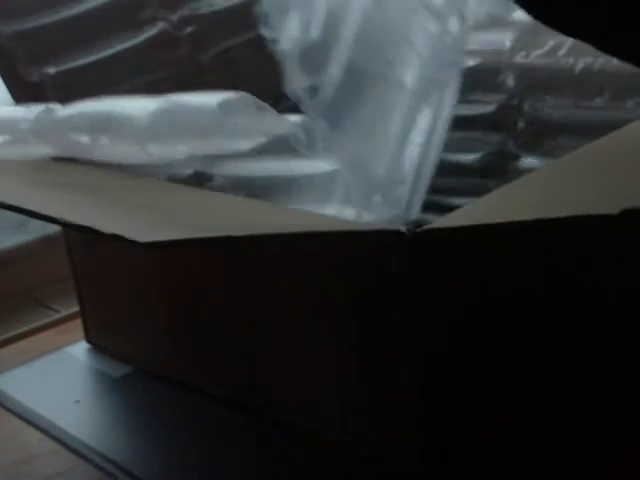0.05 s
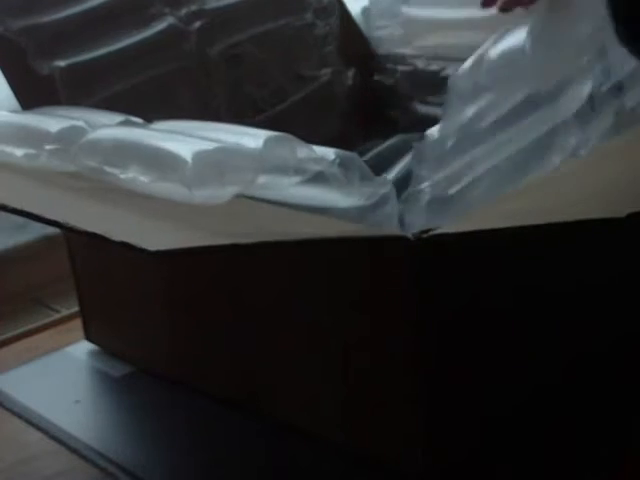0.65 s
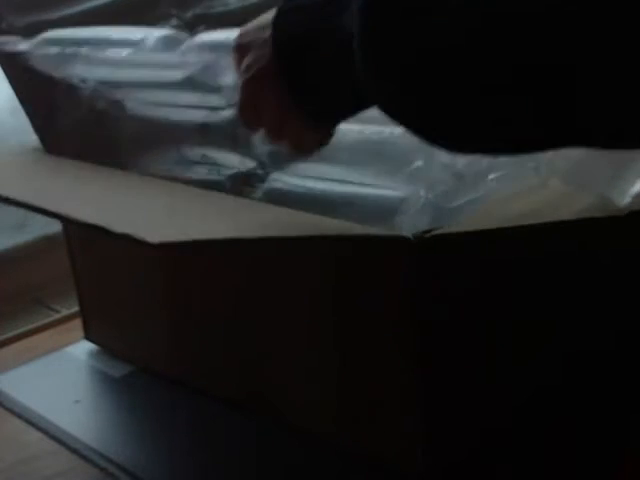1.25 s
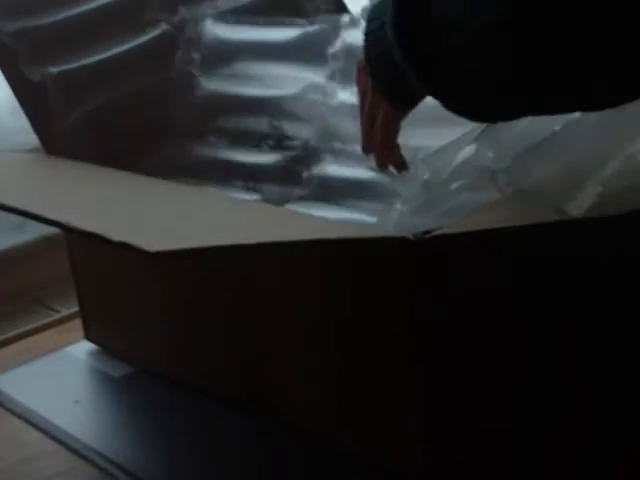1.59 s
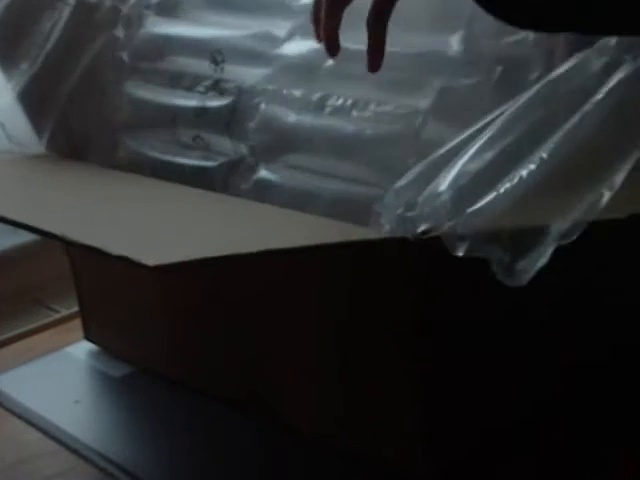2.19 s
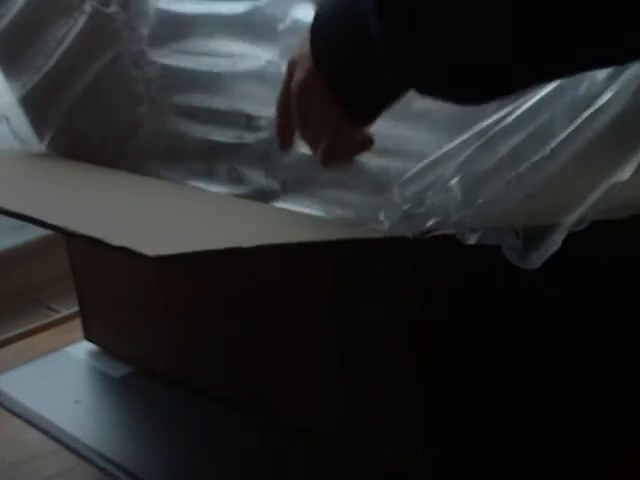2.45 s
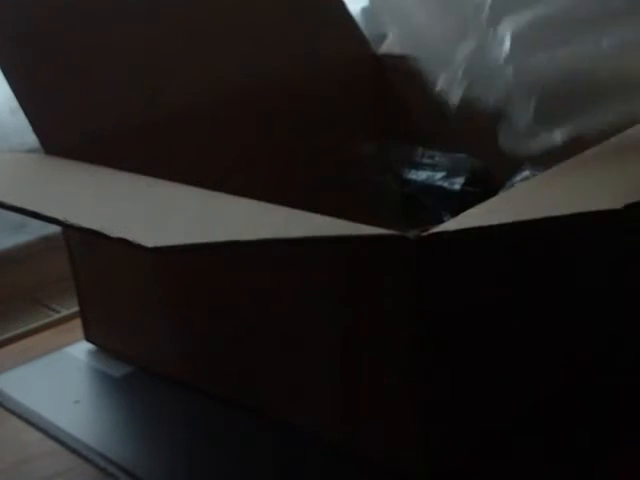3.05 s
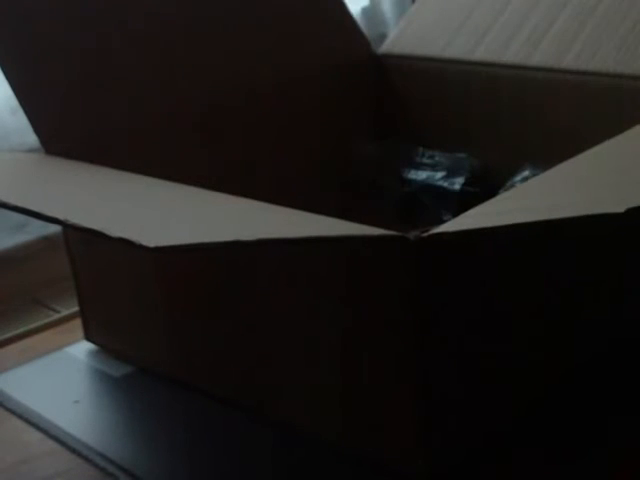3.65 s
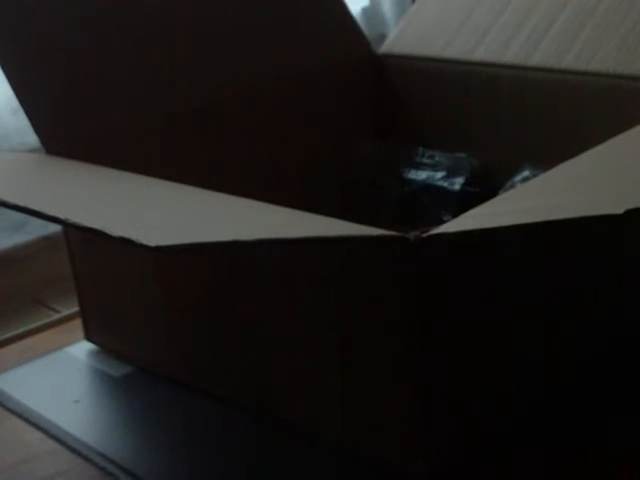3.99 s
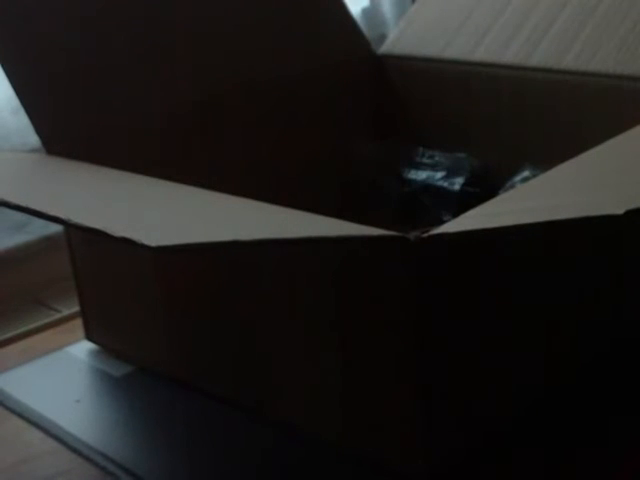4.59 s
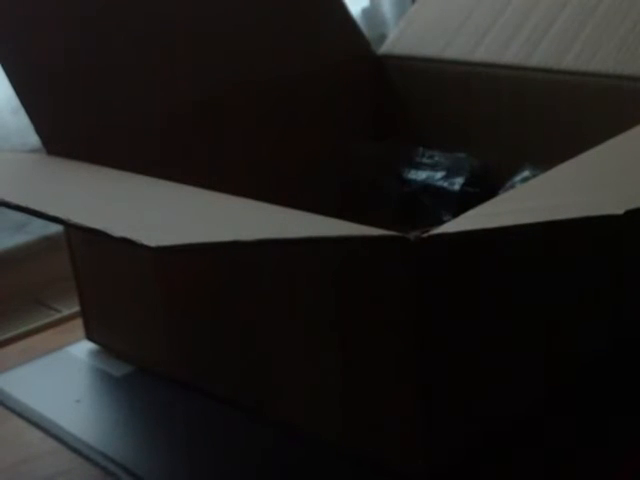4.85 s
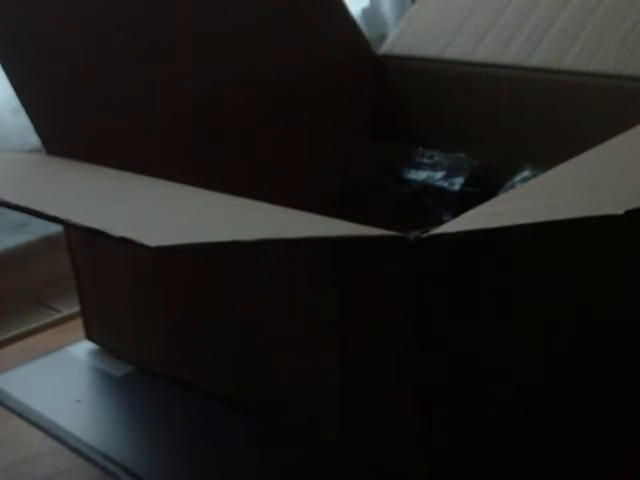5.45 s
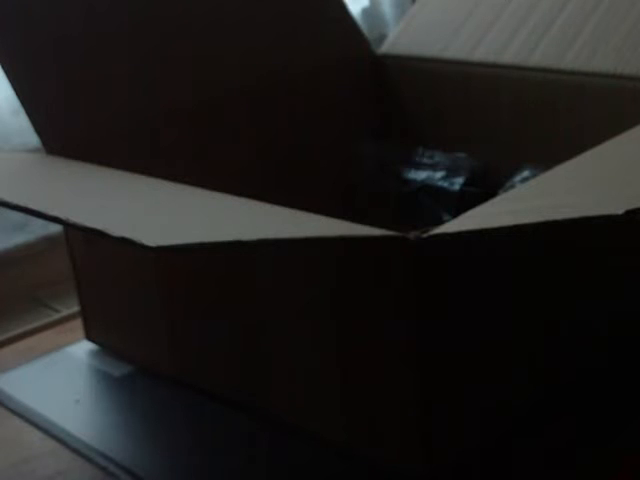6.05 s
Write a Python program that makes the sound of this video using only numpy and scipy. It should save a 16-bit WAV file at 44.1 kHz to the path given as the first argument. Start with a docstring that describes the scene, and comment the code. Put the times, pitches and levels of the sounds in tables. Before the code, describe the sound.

Plastic air pillows crackle and snap as they are pulled from a cardboard box, with one sharp knock on a flap, then quieter rustling.

```python
"""A sheet of plastic air pillows pulled out of a cardboard box in a small room, then handled more quietly.
The film crackles as it slides, the air cells and the box sound under it, creases snap, cells bump
on things and a hand knocks a box flap. One microphone stands near enough to catch the low rumble
of stirred air; behind it all are the room's short echoes and a faint hiss."""
import sys
import numpy as np
from scipy import signal
from scipy.fft import rfft, irfft
from scipy.io import wavfile

SR = 44100
rng = np.random.default_rng(int(sys.argv[2]) if len(sys.argv) > 2 else 0)


def to_wav(s):
    """Save 16-bit WAV."""
    ch = np.atleast_2d(s).T  # columns
    pcm = np.round(np.clip(ch, -1, 1) * 32767)  # PCM
    wavfile.write(sys.argv[1], SR, pcm.astype(np.int16))


N = 278712
T = np.arange(N) / SR

# steady hiss of the room: frequency_hz, gain_db
HISS_SPECTRUM = [(20, -2), (100, -8.5), (250, -6), (600, -13.5), (1100, -12.5), (2000, -17.5),
                 (3200, -15.5), (5600, -20), (7000, -23)]
# moving air at the microphone: frequency_hz, gain_db
RUMBLE_SPECTRUM = [(15, -8.5), (42, -2.5), (70, -4), (105, -14), (200, -15.5), (600, -57)]
# sweeps of arm and sheet that stir the air: start_s, length_s, level_db
AIR_GUSTS = [(0.202, 0.044, -52.5), (0.566, 0.049, -48.5), (0.87, 0.23, -53.5), (1.29, 0.15, -50),
             (1.47, 0.09, -48), (1.745, 0.14, -56), (2.24, 0.13, -51), (2.45, 0.037, -41),
             (2.584, 0.091, -55), (2.813, 0.082, -48), (2.968, .06, -47), (4.646, 0.15, -54),
             (4.907, 0.086, -66), (5.384, 0.15, -53.5), (5.926, 0.22, -53)]
# air cells bumping on things: start_s, drum_db, skid_db, length_s
CELL_BUMPS = [(2.846, -38, -35, 0.025), (3.008, -38.5, -27.5, 0.0053), (3.166, -38.5, -38, 0.0053),
              (5.4, -45, -49, 0.025), (5.946, -42, -41.5, 0.019), (6.006, -31.5, -37, 0.017)]
# resonances of an inflated cell: pitch_hz, level_db, t60_s
CELL_MODES = [(196, -2.5, 0.065), (273, 0, 0.029), (514, -7, 0.053), (1075, -5, 0.041), (1640, -12, 0.063)]
# hollow tone of sound passing through the cells: frequency_hz, gain_db
CELL_SPECTRUM = [(150, -17), (350, -6.5), (480, -6.5), (600, -8), (760, -6), (950, -1), (1250, -2),
                 (1550, -6.5), (2000, -11), (3000, -10.5), (7000, -41)]
# blows on the box flap: start_s, ring_db, slap_db, decay_rate_factor
FLAP_KNOCKS = [(1.2923, -19.5, -20, 12), (1.3008, -17, -33, 0.83)]
# resonances of the cardboard box: pitch_hz, level_db, t60_s (divided by each blow's decay_rate_factor)
BOX_MODES = [(138, 1.5, 0.27), (194, -2.5, 0.15), (261.6, -3, 0.17), (324, -3, 0.19), (513, -17.5, 0.22),
             (720, -16.5, 0.26), (880, -7, 0.093), (1180, -16, 0.16), (1240, -21, 0.13),
             (1420, -23.5, 0.33)]
# a slap on cardboard: frequency_hz, gain_db
SLAP_SPECTRUM = [(80, -40), (160, 3.5), (250, 5.5), (400, -4.5), (560, -16), (720, -6.5), (950, -9),
                 (1150, -11), (1400, -20), (1900, -27), (3500, -31.5), (7000, -46.5)]
# boom of the box walls: frequency_hz, gain_db
WALL_SPECTRUM = [(70, -19.5), (115, -7), (150, 4.5), (180, -5), (220, -8.5), (310, -10.5), (430, -15.5),
                 (700, -22.5)]
# creases giving way: start_s, dry_peak_db, pitch_hz, ring_relative_db, crackle_decay_s
CREASE_SNAPS = [(0.22, -32, 1170, 7, 0.0061), (.564, -24.5, 1450, -14, 0.0015),
                (.577, -32.5, 3430, -17, 0.011), (0.645, -27, 4400, -15, 0.003),
                (0.759, -41.5, 5430, -1, .003), (.8734, -35, 1160, 2, 0.0082),
                (0.988, -34, 3950, -11, 0.01), (1.299, -39, 3100, -16, 0.09),
                (1.7266, -32.5, 1280, 2, .0015), (1.82, -33, 3480, 7, .002),
                (2.0654, -28.5, 3000, -21, .004), (2.2025, -36.5, 1920, 11, 0.011),
                (2.4772, -26, 3480, -9.5, 0.0034), (2.564, -35.5, 5340, 21, 0.0024),
                (2.5908, -30, 3980, 3, 0.00089), (2.753, -26.5, 5100, -6, 0.0018),
                (2.86, -30.5, 1165, 2, 0.015), (2.935, -31, 2570, -1, 0.00098),
                (3.0105, -25.5, 990, 2.5, .0025), (3.108, -38.5, 2970, -5, 0.0034),
                (3.1393, -32.5, 3200, -25, 0.0051), (3.168, -31.5, 1040, 7, 0.0069),
                (3.298, -37, 1200, -3.5, 0.0081), (3.82, -40, 1130, 0, 0.011),
                (4.686, -40, 1210, 0.5, 0.019), (5.974, -33.5, 3000, -27, 0.016)]
# bright tone of the buckling film: frequency_hz, gain_db
FILM_SPECTRUM = [(200, -23), (600, -10.5), (1500, 2), (2050, -1), (2600, 1.5), (3500, 2), (4350, -2),
                 (4950, -1.5), (5400, 1.5), (5750, -0.5), (6300, -2.5), (7000, -15)]
# the held sheet never quite rests: time_s, film_db, walls_db
SHEET_SETTLING = [(0, -54, -51.5), (.72, -60, -73), (1.17, -56.5, -51.5), (1.3, -57.5, -60),
                  (1.75, -58, -48), (2.95, -60.5, -63), (3.5, -61.5, -71.5), (5.1, -64.5, -65),
                  (5.85, -65.5, -80), (6.32, -72, -74)]
# tugs and shoves of the sheet: start_s, length_s, film_db, cells_relative_db, walls_relative_db
SHEET_STROKES = [(0, .08, -53.5, -13, -12), (0.244, .05, -48, -25, -20), (0.353, 0.087, -52.5, -4.5, -3),
                 (0.513, 0.047, -57.5, -8, 11), (0.589, 0.048, -49, -2.5, -5.5),
                 (0.76, 0.15, -54.5, -13, -1), (0.913, 0.11, -52, 0.5, 5.5), (1.023, .11, -50, -2, -3.5),
                 (2.405, 0.087, -53.5, 3, -0.5), (2.518, 0.19, -47, -5, -7.5),
                 (2.707, 0.1, -49, -3.5, -2.5), (2.826, 0.065, -56, 8, 5.5), (3.057, 0.055, -60, -2, -14),
                 (3.137, .15, -57.5, 2, -7), (3.358, 0.065, -59, 7, -16), (3.799, 0.032, -58.5, 7, 4),
                 (3.923, 0.043, -62.5, -24, 0), (4.04, 0.11, -66, 4, -11), (4.259, 0.093, -54, -1.5, -2.5),
                 (4.32, .1, -51, -1, -6), (4.468, 0.12, -61, -0.5, 0.5), (4.777, 0.04, -60.5, -1.5, -14),
                 (4.892, .04, -53.5, -20, -18), (5.082, 0.046, -58.5, -8, -3.5),
                 (5.299, 0.056, -63.5, 7, -8), (5.413, 0.069, -55.5, -14, -6),
                 (5.579, 0.065, -52.5, -4, -8), (5.951, 0.095, -45, 0.5, 2)]
# contour of the long pull that draws the sheet up: time_s, contour_db
LONG_PULL = [(1.44, -56), (1.548, -46.5), (1.858, -42.5), (2.14, -45.5), (2.172, -47.5), (2.226, -44.5),
             (2.4, -53.5)]

ROOM_T60_S, HISS_DB, TOP_HZ = .3, -58, 7080
GUST_ATTACK_S, GUST_RELEASE_S, DRAUGHT_DB = 0.03, 0.045, -61
STROKE_ATTACK_S, STROKE_RELEASE_S = 0.02, 0.043
PULL_FILM_DB = -1  # relative to the contour
PULL_CELLS_DB, PULL_WALLS_DB, SETTLING_CELLS_DB = -2.5, -19, 0.5  # relative to the film


def undb(db):
    """Decibels to gain."""
    return 10 ** (np.asarray(db) / 20)


def unit_rms(x):
    """Scale to rms 1."""
    return x / np.sqrt(np.mean(x ** 2))


def at_peak(x, db):
    """Scale to a peak level."""
    return x * undb(db) / np.abs(x).max()


def add(track, start_s, x):
    """Mix a sound into the track."""
    i = int(start_s * SR)
    track[i:i + len(x)] += x[:N - i]


def convolve(x, response):
    """Pass a sound through an impulse response."""
    return signal.fftconvolve(x, response)[:len(x)]


def colour(x, spectrum, size=4096):
    """Minimum-phase filter through points of frequency_hz, gain_db."""
    hz, db = np.transpose(spectrum)
    bins_hz = np.maximum(np.fft.rfftfreq(size, 1 / SR), 1)
    gain = undb(np.interp(np.log(bins_hz), np.log(hz), db))
    cepstrum = irfft(np.log(gain))
    cepstrum[1:size // 2] *= 2
    cepstrum[size // 2 + 1:] = 0
    return convolve(x, irfft(np.exp(rfft(cepstrum))))


def top_cut(x):
    """Steep low-pass at the edge of the microphone's band."""
    return signal.sosfilt(signal.ellip(10, .2, 75, TOP_HZ, fs=SR, output="sos"), x)


def fade(t, t60_s):
    """Exponential decay, 60 dB in t60_s."""
    return np.exp(-np.log(1000) * t / t60_s)


def swell(start_s, length_s, attack_s=STROKE_ATTACK_S, release_s=STROKE_RELEASE_S):
    """Envelope of one movement: it rises, holds and dies away."""
    rise = np.clip((T - start_s) / attack_s, 0, 1)
    return rise * np.exp(-np.maximum(T - start_s - length_s, 0) / release_s)


def wander(rate_hz):
    """Smooth random wander, spread near 1."""
    knots = rng.standard_normal(N // 20)
    return np.interp(T * rate_hz, np.arange(len(knots)), knots)


def ring(modes, damping=1):
    """Impulse response of a body: damped waves, neighbouring modes swinging in opposite directions."""
    t = T[:SR // 2]
    waves = sum((-1) ** k * undb(db) * np.cos(2 * np.pi * hz * t) * fade(t * damping, t60_s)
                for k, (hz, db, t60_s) in enumerate(modes))
    return waves * (1 - np.exp(-t / 0.00081))


def small_room(direct, wet_db, positions=40):
    """Direct sound at the microphone plus dense room echoes, which change as the sheet moves."""
    t, wet = T[:SR // 2], np.zeros(N)
    for part in np.array_split(np.arange(N), positions):
        echoes = rng.standard_normal(len(t)) * fade(t, ROOM_T60_S) * (1 - np.exp(-t / 0.0021))
        add(wet, T[part[0]], signal.fftconvolve(direct[part], echoes / np.linalg.norm(echoes)))
    return (direct + undb(wet_db) * wet) / np.sqrt(1 + undb(2 * wet_db))


def room_hiss():
    """The faint, steady noise of the room."""
    return undb(HISS_DB) * unit_rms(colour(rng.standard_normal(N), HISS_SPECTRUM))


def stirred_air():
    """Air rumbles right at the microphone: a steady draught plus gusts from arm and sheet."""
    power = undb(DRAUGHT_DB) ** 2
    for start_s, length_s, level_db in AIR_GUSTS:
        power += (undb(level_db) * swell(start_s, length_s, GUST_ATTACK_S, GUST_RELEASE_S)) ** 2
    return unit_rms(colour(rng.standard_normal(N), RUMBLE_SPECTRUM)) * np.sqrt(power)


def cell_bumps():
    """An air cell skids on a surface with a hollow scrape and drums softly."""
    track, t = np.zeros(N), T[:SR // 3]
    for start_s, drum_db, skid_db, length_s in CELL_BUMPS:
        friction = rng.standard_normal(len(t)) * t * np.exp(-2 * t / length_s)
        drum = at_peak(convolve(friction, ring(CELL_MODES)), drum_db)
        skid = at_peak(colour(friction, CELL_SPECTRUM), skid_db)
        add(track, start_s, drum + skid)
    return small_room(track, wet_db=-2.5)


def flap_knocks():
    """The hand slaps the flap and damps it; the flap strikes home just after and the box rings freely."""
    track, t = np.zeros(N), T[:SR // 2]
    for start_s, ring_db, slap_db, damping in FLAP_KNOCKS:
        blow = 0.085 * rng.standard_normal(len(t)) * fade(t, t60_s=0.2)  # scatter in the cardboard
        blow[0] += 1  # first contact
        slap = at_peak(colour(blow, SLAP_SPECTRUM), slap_db)
        box = at_peak(ring(BOX_MODES, damping), ring_db)
        add(track, start_s, slap + box)
    return track


def crease_snaps():
    """A crease gives way with a sharp click and a run of smaller ones; the taut patch beside it rings."""
    track, t = np.zeros(N), T[:SR // 8]
    for start_s, peak_db, pitch_hz, ring_db, decay_s in CREASE_SNAPS:
        clicks = 0.44 * rng.standard_normal(len(t)) * np.exp(-t / decay_s)
        clicks[0] += 1.6
        crack = unit_rms(colour(clicks, FILM_SPECTRUM))
        patch = unit_rms(convolve(clicks, ring([(pitch_hz, 0, .004)])))
        add(track, start_s, at_peak(top_cut(crack + undb(ring_db) * patch), peak_db))
    return small_room(track, wet_db=-6.0)


def buckling(rate_hz, spread_db):
    """Tiny buckles of the film as random impulses; a wider spread makes a few stand out."""
    sizes = undb(spread_db * np.minimum(rng.exponential(size=N), 5))
    fires = rng.random(N) < rate_hz / SR
    signs = rng.choice([-1, 1], N)
    return unit_rms(fires * signs * sizes / np.sqrt(rate_hz))


def handling():
    """How hard the hands drive film, cells and box walls, in dB; settling, pull and strokes add in power."""
    time_s, film_db, walls_db = np.transpose(SHEET_SETTLING)
    settling_db = [np.interp(T, time_s, db) for db in (film_db, film_db + SETTLING_CELLS_DB, walls_db)]
    power = undb(settling_db) ** 2
    time_s, contour_db = np.transpose(LONG_PULL)
    pull = undb(np.interp(T, time_s, contour_db) + PULL_FILM_DB)
    pull *= swell(time_s[0], time_s[-1] - time_s[0])
    power += np.outer(undb([0, PULL_CELLS_DB, PULL_WALLS_DB]), pull) ** 2
    for start_s, length_s, film_db, cells_db, walls_db in SHEET_STROKES:
        gains = undb([film_db, film_db + cells_db, film_db + walls_db])
        power += np.outer(gains, swell(start_s, length_s)) ** 2
    return 10 * np.log10(power)


def sliding_sheet():
    """The film catches and slips; it buckles, heard directly and through the cells, and the box booms."""
    film_db, cells_db, walls_db = handling()
    rate_hz = 3000 * undb(.6 * (film_db - film_db.max()))  # harder pulls buckle the film more often
    grip = undb(1.5 * wander(rate_hz=70) + .8 * wander(rate_hz=14))
    even_buckles = buckling(rate_hz, spread_db=0.5)
    film = unit_rms(small_room(colour(even_buckles, FILM_SPECTRUM), wet_db=-3.5))
    uneven_buckles = 1.43 * buckling(rate_hz, spread_db=5.0)
    cells = unit_rms(small_room(colour(even_buckles + uneven_buckles, CELL_SPECTRUM), wet_db=0.0))
    # pressed by the sheet, the walls boom without ringing on
    walls = unit_rms(colour(rng.standard_normal(N), WALL_SPECTRUM))
    return grip * (undb(film_db - 0.43) * film + undb(cells_db + 0.28) * cells + undb(walls_db) * walls)


def scene():
    """All sources at one microphone, the same in both channels."""
    mono = sliding_sheet() + crease_snaps() + flap_knocks() + cell_bumps() + stirred_air() + room_hiss()
    return np.array([mono, mono])


def record(dry):
    """The microphone passes only the band below TOP_HZ."""
    return top_cut(dry)


dry = scene()
out = record(dry)
to_wav(out)
```